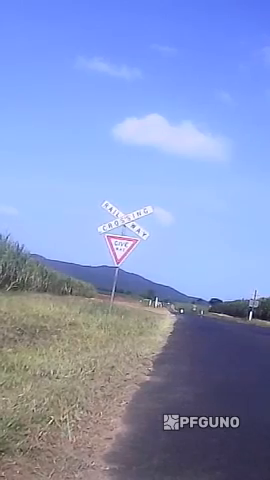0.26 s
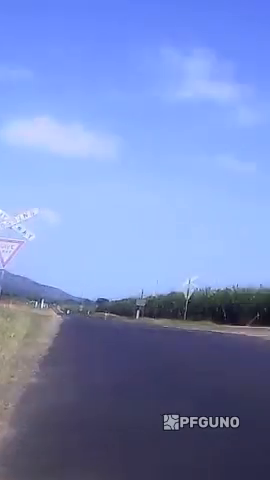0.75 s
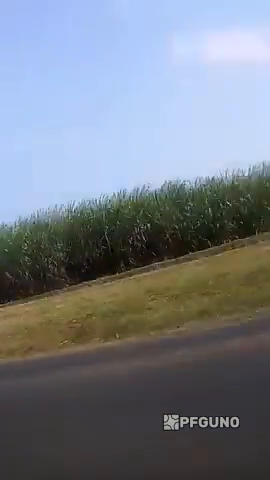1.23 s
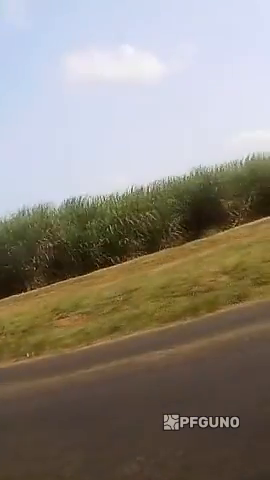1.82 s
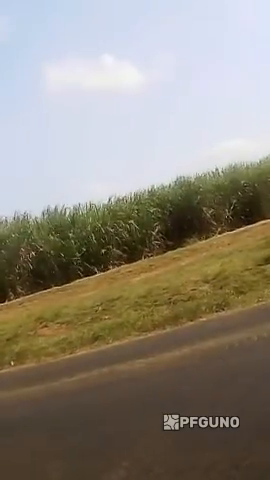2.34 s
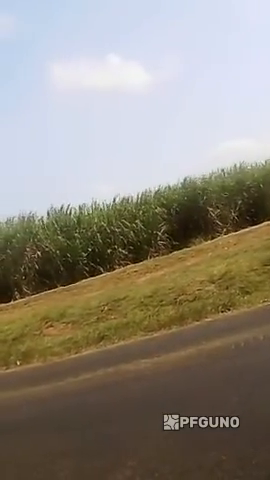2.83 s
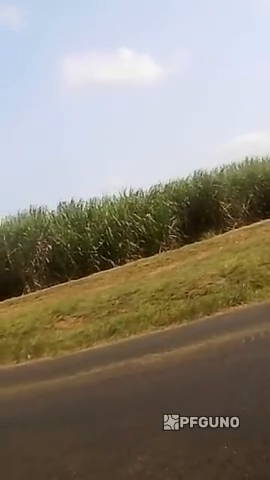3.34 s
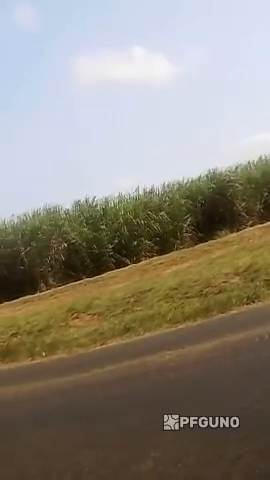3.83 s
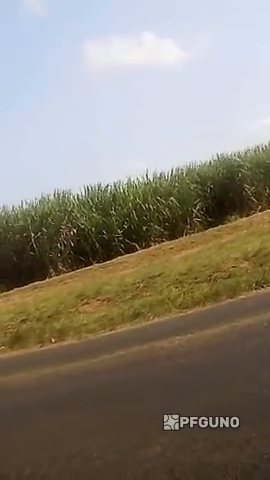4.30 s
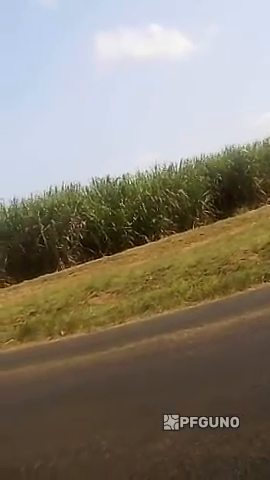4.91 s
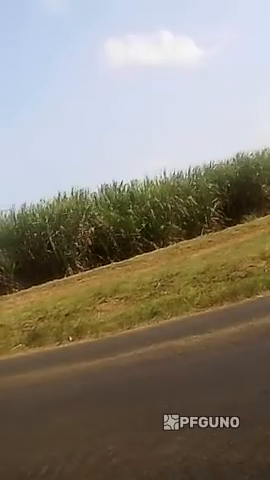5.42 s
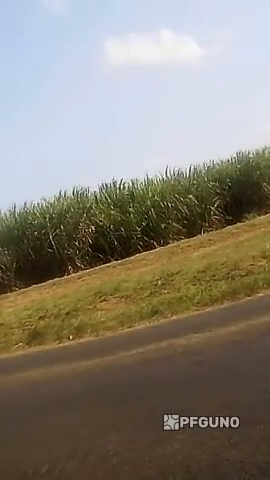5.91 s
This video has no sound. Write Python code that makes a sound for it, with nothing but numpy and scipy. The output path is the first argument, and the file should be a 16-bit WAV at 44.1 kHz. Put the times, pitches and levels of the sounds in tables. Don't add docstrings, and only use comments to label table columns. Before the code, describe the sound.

Quiet outdoor hiss, then clusters of hollow plastic knocks, frame thuds and tyre scrub, a calmer lull, then a heavy metallic clatter ringing out.

```python
import sys
import numpy as np
from scipy import signal
from scipy.fft import rfft, irfft
from scipy.io import wavfile
from scipy.ndimage import uniform_filter1d

SR = 44100
rng = np.random.default_rng(int(sys.argv[2]) if len(sys.argv) > 2 else 0)


def persist_wave(psi):
    counts = np.round(np.clip(psi, -1, 1) * 32767).astype(np.int16)
    wavfile.write(sys.argv[1], SR, np.atleast_2d(counts).T)


def magnitude_from_level(level_db):
    exponent = np.asarray(level_db, float) / 20
    return 10 ** exponent


N = 271510

# frequency in Hz, level in dB, decay time t60 in s.
CLAMP_MODES = [(415, -3.5, 0.063), (443, 1.5, 0.059), (519.7, 0, 0.088), (567.3, -2.5, 0.15),
               (646.5, -14.5, 0.0096)]
# frequency in Hz, level in dB, t60 in s.
CASE_MODES = [(789, 3.5, 0.025), (869.6, 2, 0.056), (973, -7, 0.043), (1040, -1.5, 0.05), (1144, -6, 0.064),
              (1255, -7, 0.076), (1394, 5.5, 0.038), (1450, -9.5, 0.048), (1500, 8, 0.0099),
              (1732, -4, 0.053)]
# frequency in Hz, level in dB, t60 in s.
SHELL_MODES = [(1850, 9.5, 0.024), (2150, 4.5, 0.027), (2460, -3.5, 0.011), (2865, -0.5, 0.01),
               (3410, -8, 0.016), (3670, -9, 0.015), (4280, -15, 0.043), (4950, -18, 0.019),
               (5280, -22, .02), (6700, -43.5, 0.018)]
# frequency in Hz, level in dB, t60 in s.
SWAY_MODES = [(32, -1.5, 0.058), (37, 0, 0.082), (64.5, -9, 0.41)]
# frequency in Hz, level in dB, t60 in s.
TUBE_MODES = [(85, -6.5, 0.48), (94.6, 3.5, 0.24), (115.6, -9, 0.22), (145, -1, 0.19), (183, -2, 0.32),
              (201.4, -11, 0.14), (258, -0.5, 0.06), (300.5, 0, 0.05)]
# frequency in Hz, level in dB, t60 in s.
TYRE_MODES = [(1000, 9, 0.011), (1300, -8.5, .008), (1950, 5, 0.0066), (2280, 11.5, 0.0083),
              (3245, -0.5, 0.0028), (4180, 4, 0.0061), (5070, -11.5, 0.011), (5330, -7, 0.013),
              (6600, -25, .006)]
# frequency in Hz, level in dB, t60 in s.
LATCH_MODES = [(3610, 0.5, 0.0059), (4130, 5, 0.0036), (5200, -2, 0.0055), (6040, -1.5, 0.0027),
               (6840, -8.5, 0.0076), (8700, -17.5, 0.0047), (11800, -28.5, .004)]
# frequency in Hz, level in dB, t60 in s.
PORT_MODES = [(1415, 3.5, 0.089), (1416, 5, 0.077), (1550, -4.5, 0.036)]
# frequency in Hz, t60 in s.
WHEEL_FORK_BAR = [
    (60, 2.4),
    (95.5, 1.1),
    (247, 8),
]
# frequency in Hz, level in dB, t60 in s.
SPOKE_MODES = [(247, -34, 8), (415, -45, 2.7), (487, -44.5, 4), (495, -42.5, 1.6), (524, -44.5, 1.9),
               (571, -40, 2.7), (610, -51.5, 2), (915, -59, 1.6)]
# frequency in Hz, level in dB, t60 in s.
LEVER_MODES = [(470, -44.5, .5), (589, -29.5, .34), (847, -37, 0.39), (1074, -22.5, 0.18),
               (1200, -29, 0.27), (1410, -24.5, 0.22), (1870, -51, 0.23)]
# frequency in Hz, density in dB per Hz.
AIR_SPECTRUM = [(50, -5.5), (120, 15), (170, 1), (235, -7.5), (320, -3.5), (420, -5.5), (1200, -14),
                (1800, -16), (3200, -19.5), (5000, -21.5), (6500, -25.5), (8000, -35.5), (10000, -46.5),
                (12500, -56)]
# frequency in Hz, level in dB.
WHINE_TONES = [
    (705.2, -74),
    (1410.4, -91),
    (2115.6, -90),
]

# start in s, case peak in dB, clamp in dB re case, shell in dB re case.
SIDE_KNOCKS = [(1.167, -34, -10.5, -40.5), (1.187, -34.5, -17.5, -38), (1.325, -18.5, -19, -15),
               (1.371, -21, -8.5, -17.5), (1.376, -19, -18, -4), (1.382, -31, -19, -14.5),
               (1.408, -30.5, -14, -16), (1.662, -32.5, 11, -18.5), (1.786, -32, -3.5, -12.5),
               (2.255, -46, -9.5, -1), (2.62, -45.5, -16.5, -19), (2.712, -23.5, -5.5, -18),
               (2.764, -39, -11.5, -38), (3.136, -51, -9, -7), (3.745, -33, -11, -19.5),
               (3.763, -44.5, 0.5, -14), (4.436, -46.5, -1.5, -12), (4.499, -37, -3, -22.5),
               (4.643, -36, -9.5, -32), (4.716, -33, -21.5, -22), (5.688, -16, -7, -19),
               (5.705, -20, 5, -24.5)]
# start in s, case peak in dB, clamp in dB re case, shell in dB re case.
CORNER_KNOCKS = [(1.643, -25, -7, -16.5), (1.713, -36, 5, -42), (2.553, -36.5, -16.5, -23.5),
                 (3.712, -28.5, -4.5, -18.5), (3.999, -28, -5, -18), (4.088, -37.5, -20, -17),
                 (4.294, -18.5, -13, -27.5), (4.399, -38, -4, -10.5), (4.411, -23.5, -11, -17),
                 (5.416, -27, 1, -49), (5.442, -28, 1, -42), (5.456, -24, -16, -38)]
# start in s, case peak in dB, clamp in dB re case, shell in dB re case.
BACK_KNOCKS = [(1.523, -26, -8, -10.5), (1.777, -21, -27, -7), (1.826, -27.5, -11.5, -4),
               (1.844, -28.5, -18.5, -6), (1.861, -20.5, 3.5, -12.5), (1.9, -40.5, -4, -28),
               (2.13, -44.5, -18.5, -32), (2.148, -47.5, -27.5, -30), (2.222, -38, -1, -24),
               (2.228, -27.5, -10, -13), (2.267, -39.5, -17, -41), (2.292, -41.5, -8.5, -34),
               (3.182, -46.5, -11.5, -23), (3.197, -35.5, -23, -20), (3.521, -46.5, -4.5, -18),
               (3.796, -54, 7.5, -41), (4.274, -34, -1.5, -22), (4.523, -34.5, -10.5, -15),
               (4.772, -37, -17, -23), (5.08, -55.5, -9.5, -23), (5.154, -51, 1, -12),
               (5.258, -36.5, -8.5, -27), (5.314, -44, -8, -26.5), (5.424, -12.5, -8.5, -22),
               (5.473, -33.5, -7, -16), (5.513, -26, 8, -12), (5.822, -46.5, 4.5, -16)]
# start in s, case peak in dB, clamp in dB re
# case, shell in dB re case, case pitch in Hz.
MORE_KNOCKS = [(1.355, -36.5, -8, -18, 1500), (1.398, -34.5, -9.5, -3.5, 950), (1.513, -40.5, 2.5, -21, 1410),
               (1.683, -38.5, -8, -13.5, 1400), (1.698, -36, -7, -14.5, 1450), (1.754, -35.5, -10, -21, 1450),
               (1.789, -30.5, -13.5, -13, 1450), (2.239, -42.5, -8, -11, 888), (2.247, -41.5, -8, -15, 1430),
               (2.26, -38, -13, -27, 1480), (2.275, -44, -8.5, -25.5, 1436), (3.802, -49.5, -2, -19.5, 1400),
               (4.108, -39.5, -7.5, -24, 850), (4.165, -42.5, 0, -23, 1420), (4.18, -40, -7.5, -25, 863),
               (4.196, -41.5, -13.5, -27, 1326), (4.22, -42.5, -12, -26, 1400), (4.265, -38.5, -10, -24, 1500),
               (4.284, -34.5, -13, -14.5, 1400), (4.459, -50.5, -4.5, -17, 1400),
               (4.546, -47, -3.5, -21.5, 900), (4.724, -33.5, -16, -12.5, 1425), (4.812, -51, -5.5, -15, 1450),
               (5.275, -49, -12, -18, 1080), (5.353, -47, -0.5, -25, 1400), (5.609, -46, 2.5, -25, 1350),
               (5.693, -16, -1.5, -29, 890), (5.473, -61, 1, 13, 1780), (5.517, -60.5, -1, 10.5, 1700),
               (5.424, -53.5, 0, 8.5, 1560), (1.372, -44.5, 2.5, 7.5, 1500), (1.326, -46, -3, 13, 1800)]
# start in s, case pitch in Hz, shell pitch in Hz.
SPOTS = [(1.327, 957, 2450), (1.37, 880, 2444), (1.376, 1000, 2490), (1.525, 1430, 3740),
         (1.644, 1292, 2080), (1.778, 1450, 4020), (1.827, 1450, 4080), (1.845, 1450, 4030),
         (1.861, 1450, 3700), (2.228, 1470, 3380), (2.255, 1440, 2200), (2.712, 1058, 3200),
         (3.712, 1130, 3220), (3.746, 1040, 3400), (3.766, 1080, 2800), (3.999, 1160, 3200),
         (4.294, 1300, 2000), (4.412, 1210, 2000), (4.499, 1386, 2200), (4.523, 1486, 2900),
         (4.716, 960, 2000), (4.773, 1410, 1900), (5.424, 1370, 1850), (5.473, 1480, 2140),
         (5.515, 1390, 1950), (5.687, 1400, 2110)]
# clamp peak in dB, pitch favoured in Hz.
CLAMP_PITCH = [(-24, 515), (-31, 300), (1.5, 540)]
# start in s, peak in dB.
TICKS = [(1.525, -45), (1.777, -41.5), (1.827, -47), (1.844, -52), (1.863, -53), (5.424, -58), (5.475, -61),
         (5.519, -56.5), (5.69, -32.5), (5.692, -28.5), (5.697, -34.5), (5.7005, -38), (5.703, -38.5),
         (5.709, -35.5)]
# start in s, pitch in Hz, peak in dB.
CLINKS = [(1.168, 1100, -34), (2.712, 2400, -44), (3.714, 2500, -50), (1.327, 1500, -15.5),
          (1.328, 2500, -33.5), (1.327, 4320, -44), (1.37, 2420, -25), (1.371, 1640, -24),
          (1.378, 1500, -26), (1.523, 3770, -36), (1.644, 1730, -26), (1.644, 3500, -46),
          (1.777, 1550, -21.5), (1.786, 1550, -29), (1.786, 3900, -40), (1.826, 1550, -23.5),
          (1.846, 1550, -27), (1.844, 4020, -39.5), (1.861, 1500, -20.5), (1.868, 4200, -46),
          (2.228, 3420, -49), (2.231, 2900, -53), (2.247, 1920, -47), (2.263, 2100, -49.5),
          (4.295, 1000, -22.5), (4.296, 3520, -51), (4.3, 2900, -53), (4.402, 2000, -43.5),
          (4.433, 2100, -45), (4.527, 3740, -53.5), (5.417, 3500, -60), (5.424, 1450, -15),
          (5.425, 3550, -35.5), (5.425, 5200, -53), (5.428, 6700, -57), (5.43, 2800, -48),
          (5.4745, 4130, -46), (5.475, 5070, -59), (5.513, 1500, -24), (5.514, 3380, -51.5),
          (5.519, 3930, -44), (5.52, 4900, -58), (5.6879, 414, 2), (5.6884, 780, -5), (5.688, 3770, -35),
          (5.6923, 428, -5), (3.713, 538, -31.5), (3.999, 536, -32.5)]
# start in s, sway peak in dB, tubes in dB re sway, strongest tube pitch in Hz.
PUSHES = [(1.166, -25, -7.5, 85), (1.319, -15, -5, 85.8), (1.37, -18, -7.5, 87.4), (1.421, -22, -7, 89.5),
          (1.526, -25, -7, 100.3), (1.655, -28.5, 16.5, 134), (1.692, -18, -1.5, 85.5),
          (1.782, -22, -0.5, 94.6), (1.918, -34, 2, 145), (2.235, -21, 2.5, 93.5), (3.747, -52.5, 14.5, 90),
          (4.002, -49.5, 7.5, 101.5), (4.065, -50, 9, 119.4), (4.4, -19, 6.5, 208),
          (4.498, -36.5, 1.5, 124.2), (4.608, -33, 7.5, 86), (4.78, -30, 0.5, 97.3), (5.443, -15.5, 4, 183),
          (5.699, -20, 10.5, 180.3)]
# start in s, sway peak in dB, tubes in dB re sway, strongest tube pitch in Hz, ring length factor.
PULLS = [(1.859, -15, -10, 90.4, 0.83), (2.223, -23, 0, 100.7, 0.19), (4.292, -42.5, 19.5, 106.4, 0.99),
         (4.645, -38.5, 15, 94, 0.85), (5.422, -16, -5, 219, 0.49), (5.684, -11, -7, 85.4, 0.44)]
# start in s, sway peak in dB, tubes in dB re sway, strongest tube pitch in Hz, ring length factor.
TAPS = [
    (1.015, -29, 10, 107.7, 0.2),
    (1.875, -12.5, -8, 100.3, 0.35),
    (5.511, -10, 0.5, 247.4, 0.81),
]
# start in s, frequency in Hz, level in dB, t60 in s.
PINGS = [(1.56, 145, -31, .26), (1.76, 495, -47, .9), (1.9, 140, -17, .37), (1.96, 143, -40, 1),
         (2.3, 487, -56, 2), (2.714, 1112, -53.5, .98), (2.714, 547.6, -54, 2.2), (3.713, 1112, -49, .63),
         (3.767, 98, -37.5, .63), (4.089, 200.6, -38.5, .48), (4.3, 2090, -66, .33),
         (4.634, 94.2, -25, .34), (4.64, 185, -33, .5), (5.334, 183.7, -39.5, .48), (5.515, 1405, -31, .17),
         (5.52, 1480, -39, .33), (5.52, 598, -38, .4), (5.521, 1345, -42, .6), (5.705, 183, -28, .48),
         (5.705, 505, -31, .6), (5.72, 445, -35, .5), (5.7709, 563, -42, 2.6)]
# start in s, wheel in dB, fork in dB, bar tube in dB, slack of the grip as a pitch factor.
HUMS = [(1.867, -33, -54.5, -46.5, 1), (2.235, -32.5, -45.5, -50, .993), (4.41, -30, -56.5, -40, 0.98),
        (5.52, -29.5, -53, -31, .998), (5.7, -28.5, -47, -45, 1.003)]
# start in s, pitch in Hz, peak in dB.
CREAKS = [(1.352, 372, -27.5), (1.396, 625, -25), (1.424, 860, -25.5), (4.15, 476, -35.5),
          (4.163, 546, -41), (5.455, 644, -23.5), (5.706, 868, -33), (4.505, 520, -43), (4.64, 494, -35),
          (5.465, 283, -23)]
# start in s, pitch in Hz, peak in dB.
SNAPS = [(2.711, 1080, -27), (3.71, 1100, -29), (3.998, 1000, -31.5), (2.761, 880, -45.5),
         (3.762, 1050, -38.5), (1.38, 880, -28), (4.409, 1260, -23.5), (4.396, 253, -19),
         (4.408, 800, -29.5), (5.694, 270, -17.5), (5.703, 330, -19.5), (1.4, 850, -37), (5.424, 480, -18),
         (5.512, 403, -17), (1.782, 800, -37), (2.22, 420, -28)]
# start in s, length in s, clamp rub in dB, case rub in dB, frame shake in dB.
MOVES = [(0.997, 0.027, -64.5, -56.5, -48), (1.049, 0.086, -59.5, -49, -42.5),
         (1.142, 0.14, -55.5, -46.5, -34), (1.292, 0.31, -51, -45.5, -28),
         (1.485, 0.086, -50.5, -54, -21.5), (1.667, 0.049, -46.5, -47, -29),
         (1.857, 0.029, -50, -45, -29.5), (2.309, 0.19, -62, -66.5, -44.5),
         (2.839, 0.58, -67.5, -70.5, -61.5), (3.46, 0.035, -77.5, -73, -49.5),
         (3.739, 0.027, -61, -54.5, -51), (4.024, 0.04, -59.5, -48.5, -39.5),
         (4.123, 0.092, -55, -51, -46.5), (4.276, 0.015, -48, -46.5, -52.5), (4.579, 0.12, -51.5, -47, -34),
         (5.269, 0.11, -67.5, -64, -49.5), (5.458, 0.04, -42, -44.5, -21.5),
         (5.55, 0.052, -50.5, -58.5, -29.5), (5.748, .1, -45, -58, -40)]
# start in s, length in s, level in dB re tyre hiss.
SCRUBS = [
    (1.04, 0.36, 5.5),
    (4.035, 0.26, -2.5),
    (4.548, 0.2, -2),
    (5.435, 0.088, 11),
]

SIDE_HZ, CORNER_HZ, BACK_HZ = 900, 1170, 1440
SPOT_SCATTER_DB = 1.8
TWIST_DB = -59.5
RISE_S = 0.024


def ring(modes, length_s, scatter_db, near_hz=1., focus_db=0., last=0.83, detune=0.018):
    hz, db, t60 = np.transpose(modes)[:, :, None]
    luck = rng.standard_normal((2, len(modes), 1))
    t = np.arange(int(length_s * SR)) / SR
    octaves_off = np.minimum(np.abs(np.log2(hz / near_hz)), 1)
    db = db + scatter_db * luck[0] - focus_db * octaves_off
    decay = np.exp(-np.log(1000) * t / (t60 * last))
    waves = np.sin(2 * np.pi * hz * (1 + detune * luck[1]) * t) * decay
    side = (-1) ** (np.arange(len(modes))[:, None] // 2)
    return (magnitude_from_level(db) * side * waves).sum(axis=0)


def blow(answer, contact_s, chatter_s, chatter, rise_s=1e-4):
    t = np.arange(int(0.049 * SR)) / SR
    force = chatter * rng.standard_normal(len(t)) * np.exp(-t / chatter_s)
    force[0] = 1
    push = np.hanning(int(contact_s * SR) + 3)
    y = signal.fftconvolve(answer, np.convolve(force, push))
    y = y * (1 - np.exp(-np.arange(len(y)) / (rise_s * SR)))
    return y / np.abs(y).max()


def shaken(modes, force, widen, near_hz=1., focus_db=0.):
    y = signal.fftconvolve(force, ring(modes, 0.8, 0, near_hz, focus_db, 1 / widen))[:N]
    return y / y.std()


def walk(rate):
    k = int(SR / rate)
    steps = np.repeat(rng.standard_normal(N // k + 1), k)
    return 1.15 * uniform_filter1d(uniform_filter1d(steps, k), k)[:N]


def spell(start_s, hold_s, db, rise_s, t60):
    t = np.arange(0, N + 64, 64) / SR - start_s
    fall = np.log(1000) * np.maximum(t - hold_s, 0) / t60 + np.maximum(-t, 0) / rise_s
    return (magnitude_from_level(db) * np.exp(-fall)) ** 2


def effort(spells, rest_db):
    power = sum(spells) + magnitude_from_level(rest_db) ** 2
    return np.interp(np.arange(N) / 64, np.arange(len(power)), np.sqrt(power))


def add(out, s, y):
    i = int(s * SR)
    y = y[:N - i]
    out[i:i + len(y)] += y


def knock(s, db, clamp_db, shell_db, hz):
    face = (hz, 2.3 * hz)
    hz, shell_hz = next((spot[1:] for spot in SPOTS if abs(spot[0] - s) < .003), face)
    clamp_db, shell_db = db + clamp_db, db + shell_db
    case_last, clamp_last = min(.45 - db / 36, 1), min(.4 - clamp_db / 40, 1)
    soft = np.clip(-db / 22, .1, 1)
    clamp_hz = np.interp(clamp_db, *np.transpose(CLAMP_PITCH))
    case = ring(CASE_MODES, .12, SPOT_SCATTER_DB, hz, 9.0 - .23 * db, case_last)
    clamp = ring(CLAMP_MODES, .15, SPOT_SCATTER_DB, clamp_hz, 13.0 - 1.82 * clamp_db, clamp_last)
    shell = ring(SHELL_MODES, .06, 0.57, shell_hz, 17.2)
    return [magnitude_from_level(db) * blow(case, 0.00031, 0.0023, 0.13, soft * 0.0014),
            magnitude_from_level(clamp_db) * blow(clamp, 0.0012, 0.0059, 0.085, soft * 0.0026),
            magnitude_from_level(shell_db) * blow(shell, .00003, 0.004, 0.12, soft * 0.001)]


def knocks():
    out = np.zeros(N)
    for hz, table in ((SIDE_HZ, SIDE_KNOCKS), (CORNER_HZ, CORNER_KNOCKS), (BACK_HZ, BACK_KNOCKS)):
        for row in table:
            for part in knock(*row, hz):
                add(out, row[0], part)
    for s, db in TICKS:
        latch = ring(LATCH_MODES, .02, 1.3, detune=0.017)
        add(out, s, magnitude_from_level(db) * blow(latch, .00003, 0.001, 0.17))
    return out


def more_knocks():
    out = np.zeros(N)
    for row in MORE_KNOCKS:
        for part in knock(*row):
            add(out, row[0], part)
    return out


def clinks():
    out = np.zeros(N)
    t = np.arange(int(.08 * SR)) / SR
    for s, hz, db in CLINKS:
        t60 = 12.4 / hz + 0.0086
        fall = np.exp(-np.log(1000) * t / t60)
        rise = (1 - np.exp(-t * hz / 0.4)) ** 2
        add(out, s, magnitude_from_level(db) * fall * rise * np.sin(2 * np.pi * hz * t))
    return out


def jolts():
    out = np.zeros(N)
    pushes = [(*push, 1) for push in PUSHES]
    for way, table in ((0.94, pushes + TAPS), (-1.7, PULLS)):
        for s, db, tube_db, hz, last in table:
            sway = ring(SWAY_MODES, .5, 1.5, last=last)
            tubes = ring(TUBE_MODES, .35, SPOT_SCATTER_DB, hz, 9.4, last)
            add(out, s, way * magnitude_from_level(db) * blow(sway, 0.011, 0.0052, 0.023))
            add(out, s, way * magnitude_from_level(db + tube_db) * blow(tubes, 0.00053, 0.01, 0.054))
    return out


def pings():
    out = np.zeros(N)
    t = np.arange(int(.9 * SR)) / SR
    swell = (1 - np.exp(-t / 0.0098)) * np.cos(np.pi / 2 * t / t[-1])
    rings = list(PINGS)
    for s, *dbs, slack in HUMS:
        rings += [(s, hz * slack, db, t60) for db, (hz, t60) in zip(dbs, WHEEL_FORK_BAR)]
    rings += [(5.77, *mode) for mode in SPOKE_MODES]
    rings += [(5.428, *mode) for mode in LEVER_MODES]
    for s, hz, db, t60 in rings:
        stop_s = min([hum[0] - s for hum in HUMS if hum[0] > s + .1] + [9])
        choke = np.clip((stop_s - t) / 0.01, 0, 1)
        add(out, s, swell * choke * ring([(hz, db, t60)], 1, 0, detune=0)[:len(t)])
    return out


def creaks():
    out = np.zeros(N)
    for table, length_s, rise in ((CREAKS, 0.016, 0.15), (SNAPS, .012, -0.21)):
        u = np.arange(int(length_s * SR)) / (length_s * SR)
        hump = np.sin(np.pi * u ** 0.84) ** 2
        for s, hz, db in table:
            cycles = hz * length_s * u * (1 + rise * (u - 1))
            add(out, s, magnitude_from_level(db) * hump * np.sin(2 * np.pi * cycles))
    return out


def rubbing():
    chance = rng.random((2, N))
    slips = (chance[0] < 1500 / SR) * magnitude_from_level(12 * chance[1]) * np.sign(rng.standard_normal(N))
    force = (slips / slips.std() + 0.43 * rng.standard_normal(N)) * magnitude_from_level(1.0 * walk(40))

    rattles = [spell(s + 0.0044, 0.0072, 0.69 * min(db, -16) - 32, .004, 0.3)
               for s, db, *_ in SIDE_KNOCKS + CORNER_KNOCKS + BACK_KNOCKS]
    case_rubs = [spell(s, hold, db, RISE_S, 0.53) for s, hold, _, db, _ in MOVES]
    clamp_rubs = [spell(s, hold, db, RISE_S, .9) + spell(s, hold, db - 2.5, RISE_S, 1.3)
                  for s, hold, db, _, _ in MOVES]
    case = effort(case_rubs + rattles, -74.5)
    clamp = effort(clamp_rubs + [magnitude_from_level(-14.5) * r for r in rattles], -78.0)
    twist = effort([spell(1.062, 0.49, TWIST_DB, 0.048, 1.5)], -100)

    mount = clamp * magnitude_from_level(2.7 * walk(35)) * shaken(CLAMP_MODES, force, 0.76)
    for part, db in ((CASE_MODES[:3], -7), (CASE_MODES[3:6], -7), (CASE_MODES[6:-1], -6)):
        mount += case * magnitude_from_level(db + 1.7 * walk(45)) * shaken(part, force, 1.25)
    port_gain = np.minimum(magnitude_from_level(-24.0) * case ** 0.83, magnitude_from_level(-62))
    port = port_gain * shaken(PORT_MODES, force, 1.0)
    tread_force = (rng.standard_normal(N) + 0.87 * force) * magnitude_from_level(1.4 * walk(33))
    return mount + port + twist * shaken(TYRE_MODES, tread_force, 0.83)


def scrape():
    band = signal.butter(6, [350, 1620], "bandpass", fs=SR, output="sos")
    y = signal.sosfilt(band, rng.standard_normal(N) * magnitude_from_level(1.7 * walk(60)))
    gain = effort([spell(s, hold, TWIST_DB + db, .015, .35) for s, hold, db in SCRUBS], -110)
    return gain * y / y.std()


def shaking():
    blows = PUSHES + PULLS
    sway = effort([spell(s, hold, db - 7, RISE_S, 0.27) for s, hold, *_, db in MOVES]
                  + [spell(b[0] + 0.009, 0.01, b[1] - 12.5, .01, 0.5) for b in blows], -52.5)
    tubes = effort([spell(s, hold, db, RISE_S, 0.72) for s, hold, *_, db in MOVES]
                   + [spell(b[0] + 0.018, 0.012, b[1] + b[2] - 9, 0.011, 0.44) for b in blows], -54.5)
    sway, tubes = (gain / np.hypot(1, gain / magnitude_from_level(-29)) for gain in (sway, tubes))
    force = rng.standard_normal((2, N)) * magnitude_from_level(1.5 * walk(20))
    tube_ring = shaken(TUBE_MODES, force[1], .8, 125, 6)
    return sway * shaken(SWAY_MODES, force[0], 1.8) + tubes * tube_ring


def air():
    hz, db = np.transpose(AIR_SPECTRUM)
    f = np.maximum(np.arange(N // 2 + 1) * SR / N, 1)
    shape = magnitude_from_level(np.interp(np.log(f), np.log(hz), db))
    y = irfft(rfft(rng.standard_normal(N)) * shape, N)
    return y / y.std() * magnitude_from_level(-59 + .5 * walk(3.4))


def whine():
    t = np.arange(N) / SR
    beat_hz, depth = 24.2, .36
    pulse = np.cos(2 * np.pi * beat_hz * t) + .9 * np.cos(4 * np.pi * beat_hz * t)
    tones = sum(np.sqrt(2) * magnitude_from_level(db) * np.sin(2 * np.pi * hz * t) for hz, db in WHINE_TONES)
    return (1 + 2 * depth * pulse) * tones


def scene():
    impacts = knocks() + more_knocks() + clinks() + jolts()
    mix = impacts + pings() + creaks() + rubbing() + scrape() + shaking() + air() + whine()
    return mix[None]


def low_pass(x):
    return signal.sosfilt(signal.butter(12, 11900, fs=SR, output="sos"), x)


def record(dry):
    rounded = .97 * np.tanh((dry - dry.mean()) / .97)
    offset = .0078
    return low_pass(rounded + offset)


dry = scene()
out = record(dry)
persist_wave(out)
```